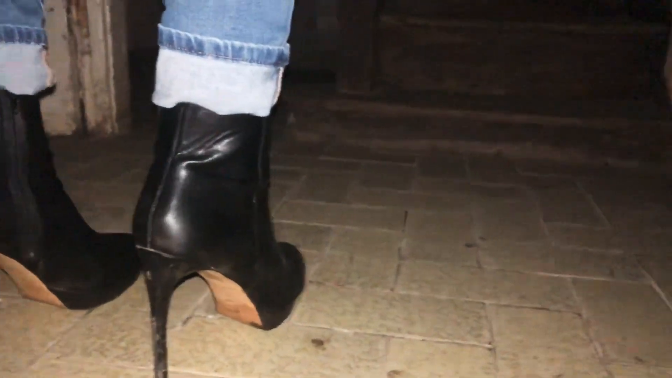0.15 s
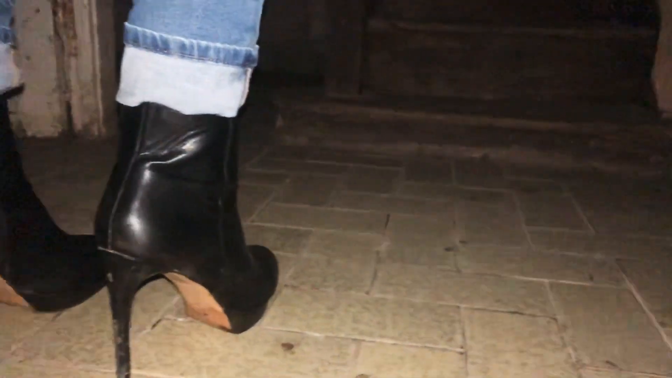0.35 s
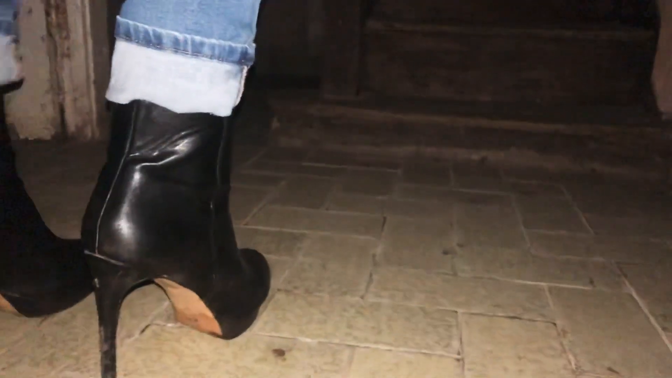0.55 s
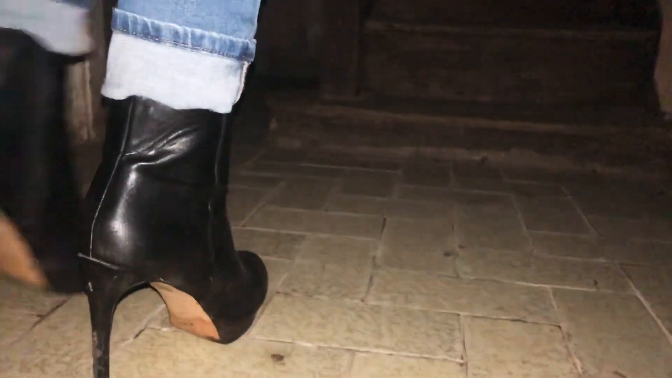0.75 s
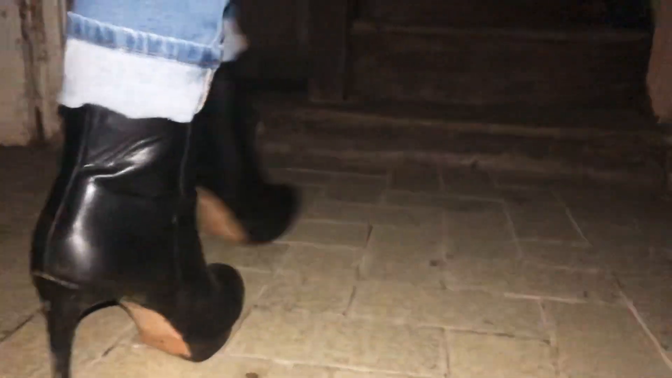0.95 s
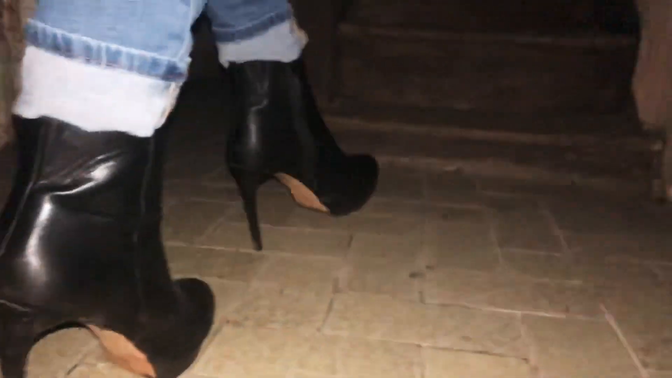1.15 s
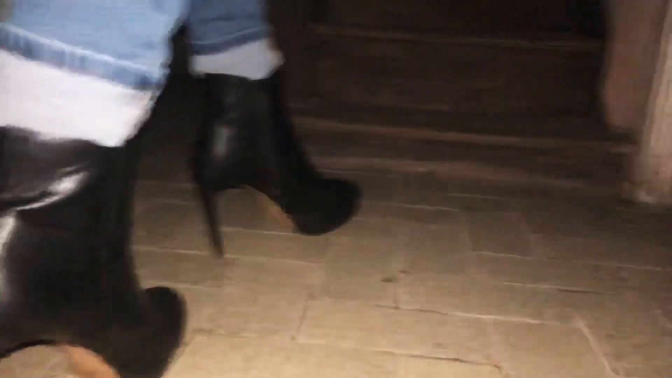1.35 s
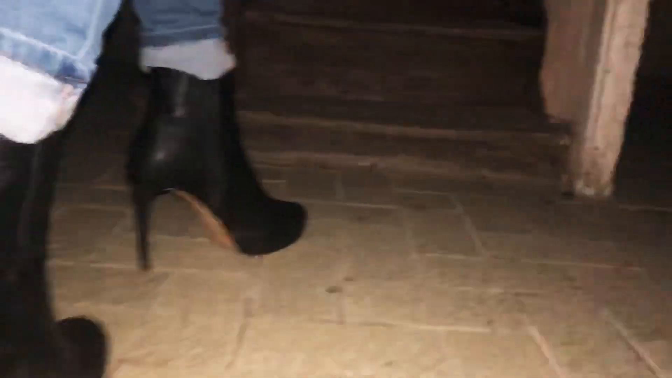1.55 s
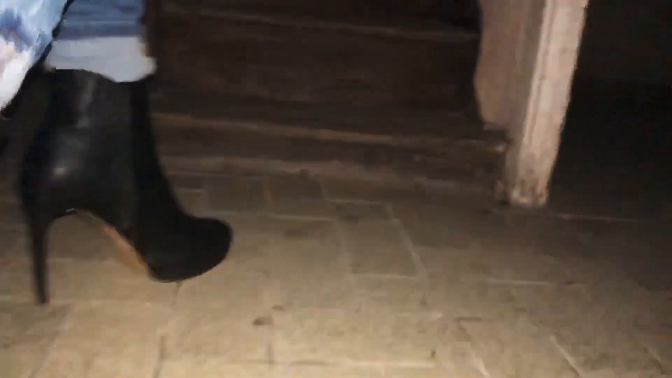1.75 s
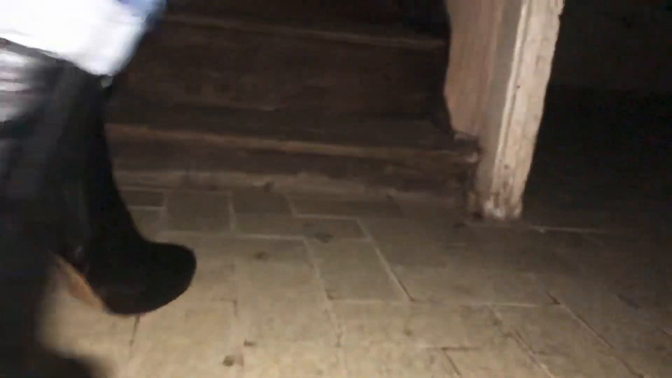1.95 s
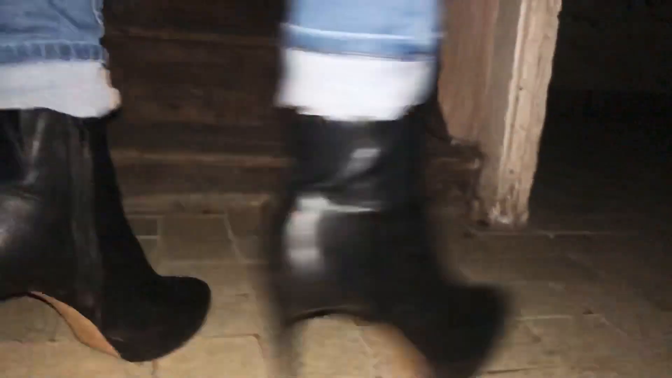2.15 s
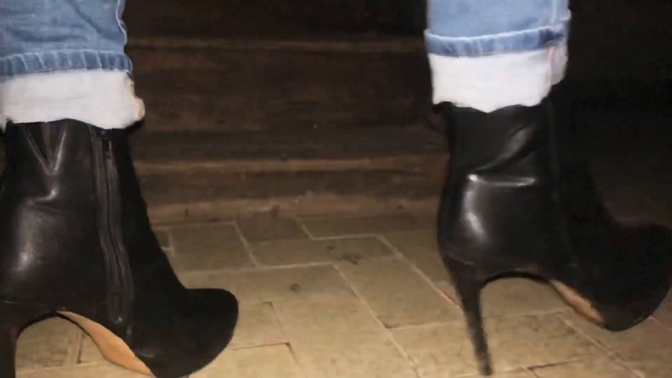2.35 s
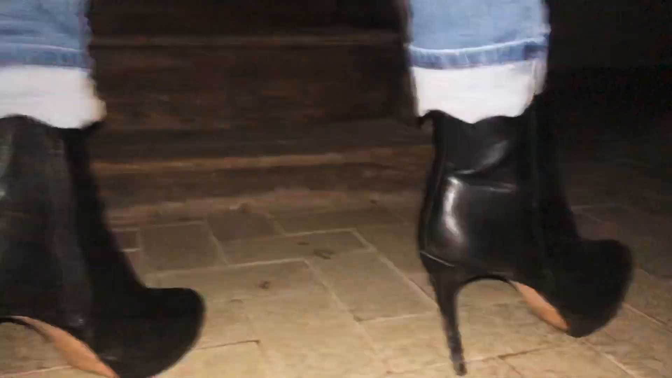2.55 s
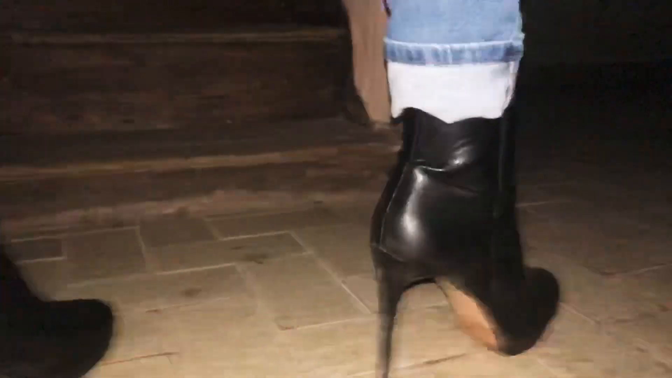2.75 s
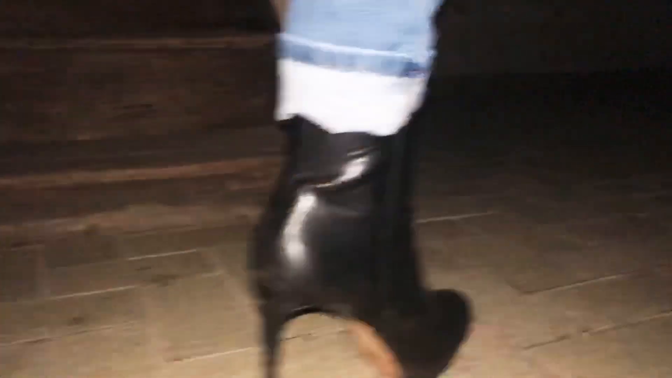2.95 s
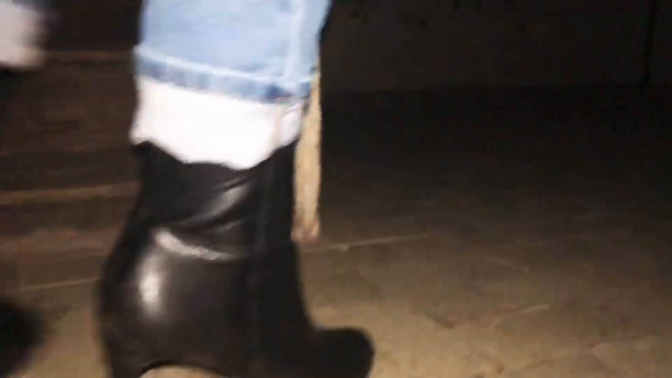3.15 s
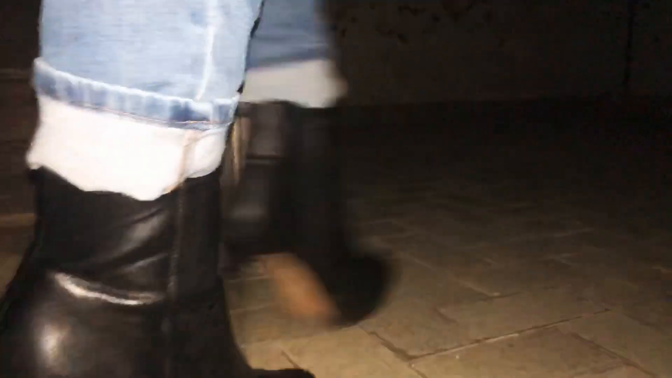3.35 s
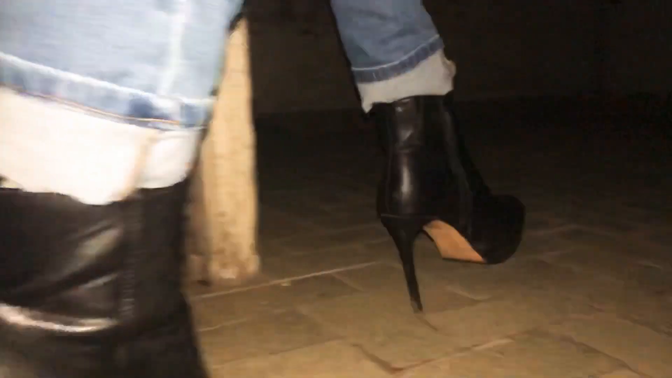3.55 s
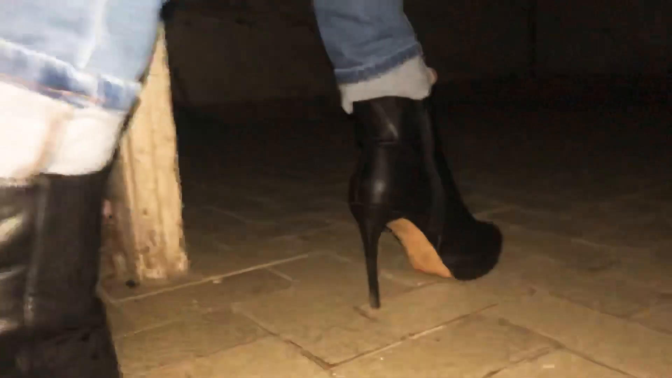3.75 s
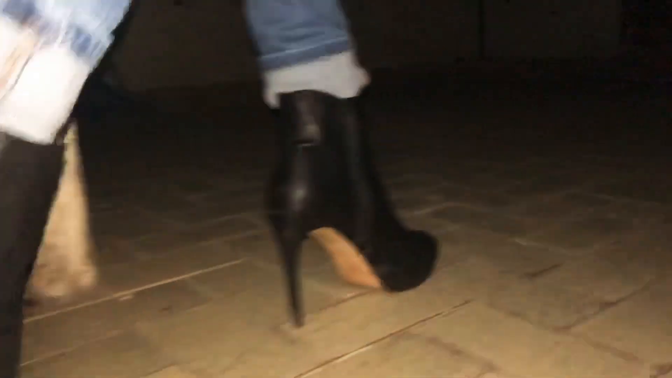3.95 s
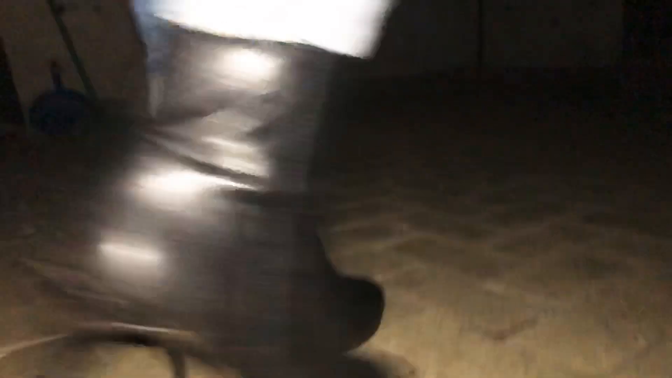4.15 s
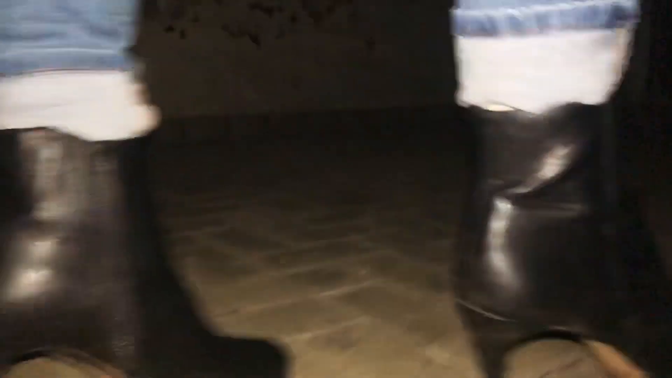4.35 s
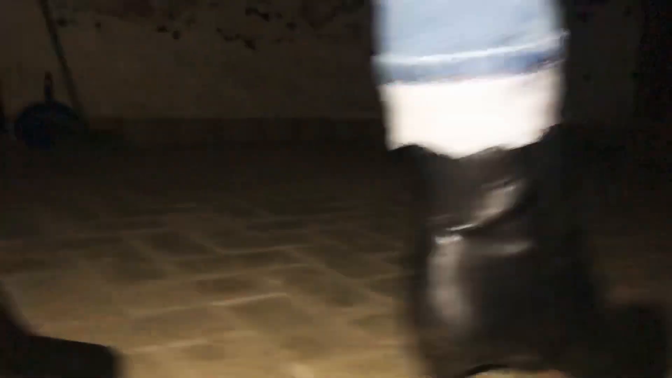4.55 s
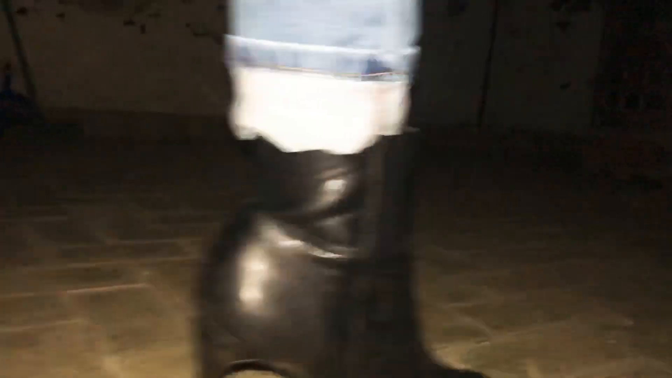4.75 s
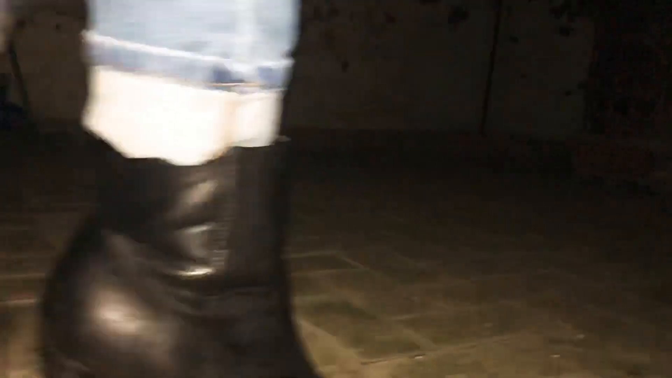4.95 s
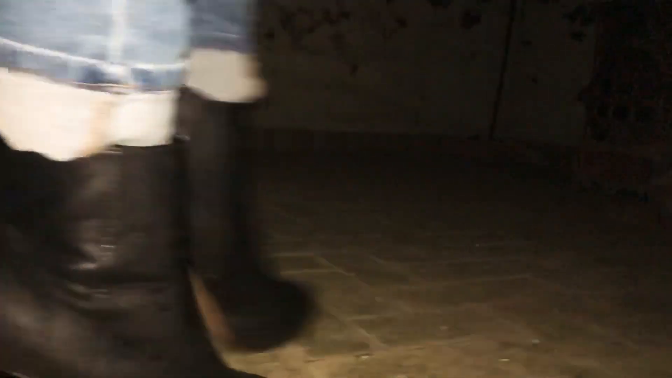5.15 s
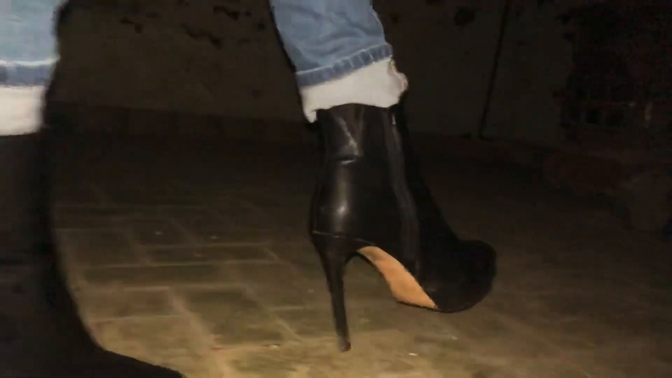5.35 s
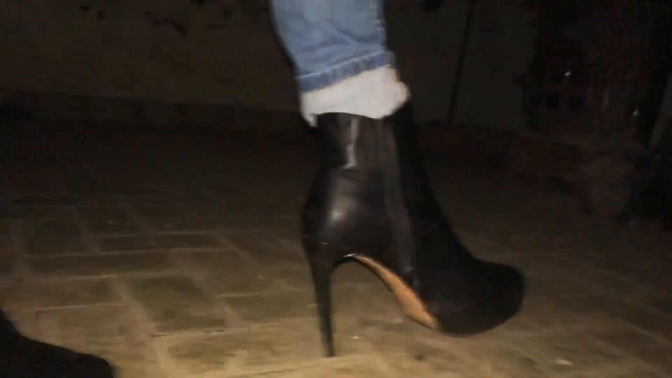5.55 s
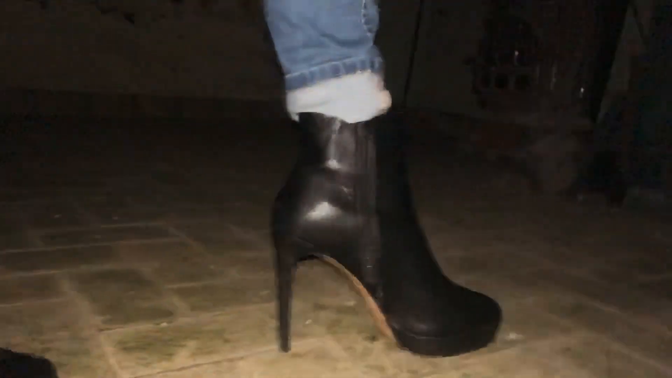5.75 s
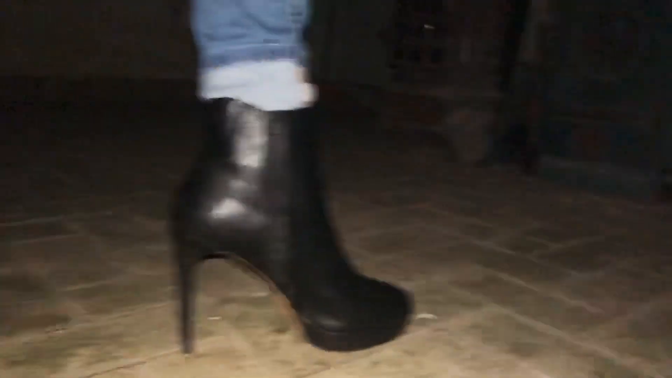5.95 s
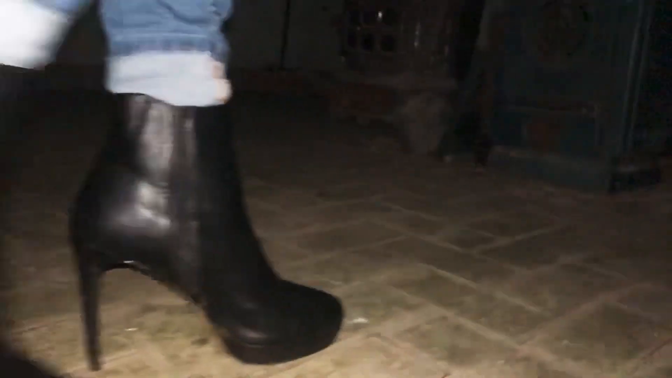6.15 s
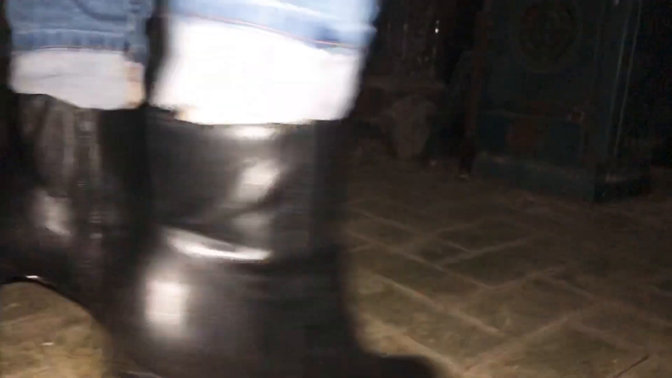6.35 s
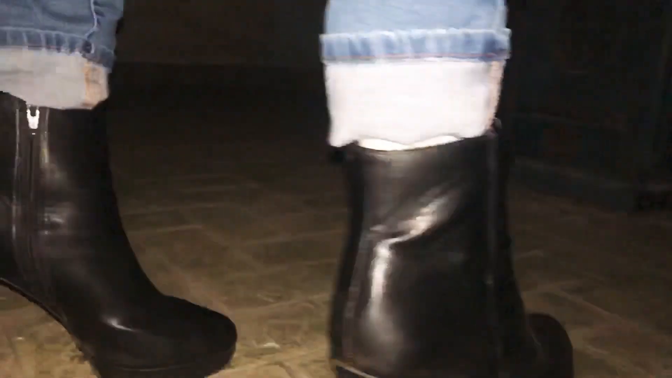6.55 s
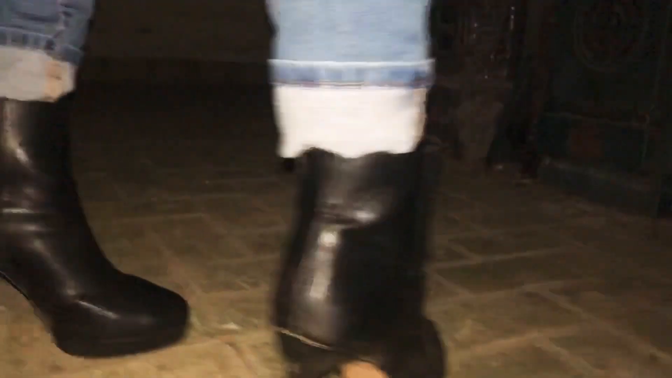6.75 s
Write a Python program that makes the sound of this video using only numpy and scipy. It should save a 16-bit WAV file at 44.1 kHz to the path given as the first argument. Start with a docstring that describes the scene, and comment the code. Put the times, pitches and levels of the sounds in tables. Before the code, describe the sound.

Close, unhurried footsteps of high-heeled leather boots on a sandy stone floor, softly creaking, with a short room echo.

```python
"""An empty building with bare walls and gritty stone tiles: slow steps in high-heeled boots, close by.
Heel and then sole strike the floor, exciting damped modes; sand crunches under them and the sole chirps.
As the weight rolls over, leather creases stick and slip in snaps and creaks, and the clothes rustle.
The walls reverberate with the boots above a faint rumble and hiss."""
import sys
import numpy as np
from scipy import signal
from scipy.fft import rfft, irfft, next_fast_len
from scipy.io import wavfile
from scipy.ndimage import uniform_filter1d

SR = 44100
rng = np.random.default_rng(int(sys.argv[2]) if len(sys.argv) > 2 else 0)


def wav_out(sig):
    """Save sig, one row per channel (or a flat mono array), as 16-bit PCM at SR to the path in sys.argv[1]."""
    wavfile.write(sys.argv[1], SR, np.round(np.clip(np.atleast_2d(sig).T, -1, 1) * 32767).astype(np.int16))


N = 298998

# Levels are relative within each column; a tilt is the brightness of the grit.
# spectrum of the still air: frequency_hz, level_db
AIR_SPECTRUM = [(15, -47), (25, -18.5), (102, -3.5), (134, -8.5), (416, -14), (489, -11), (531, -13.5),
                (818, -17.5), (962, -20), (2050, -25), (2480, -26), (2990, -26), (5000, -27), (8590, -30),
                (16000, -35)]
# course of the building's rumble: time_s, level_db
RUMBLE_LEVELS = [(0, -74), (3.3, -71.5), (4.2, -78.5), (6.78, -84)]
# reverberation time of the room: frequency_hz, t60_s
ROOM_T60 = [(100, 0.74), (250, 0.35), (700, 0.44), (1500, 0.59), (4000, 0.44), (8000, 0.4), (15000, 0.42)]
# colour of the reverberation: frequency_hz, gain_db
ROOM_SPECTRUM = [(60, 8.5), (155, -1.5), (230, -5.5), (310, -2), (450, -4.5), (680, 6), (900, -10),
                 (1400, -4), (3500, -1.5), (8000, -3.5), (15000, -8)]
# denim and leather rub at each push-off and leg swing: peak_s, level_db, build_up_s
RUBS = [(.73, -68, 0.064), (1.4, -68.5, 0.1), (1.88, -62, 0.27), (2.43, -69.5, 0.2), (3.148, -64.5, 0.66),
        (3.5, -68.5, 0.15), (4.07, -61, 0.24), (4.41, -67, 0.14), (4.9, -62.5, 0.45), (5.32, -70, 0.19),
        (5.66, -77, 0.26), (6.13, -66, 0.74), (6.77, -65, 0.11)]
# spectrum of the rustle: frequency_hz, level_db
CLOTH_SPECTRUM = [(300, -2), (900, 1.5), (2000, -2.5), (4500, -5), (8000, -8), (15000, -17)]
# runs of faint ticks around a footfall: start_s, level_db, tick_count, gap_s
TICK_RUNS = [(1.3174, -58.5, 5, .0416), (2.6756, -53.5, 6, 0.045), (3.685, -56.5, 3, .0435),
             (5.622, -59.5, 5, .0405)]
# single slips of a leather crease: start_s, level_db, pitch_hz
SNAPS = [(0.119, -54.5, 5470), (.618, -52.5, 6000), (.722, -49, 4200), (.750, -55, 1520),
         (1.374, -50, 1600), (1.5542, -36.5, 1800), (1.909, -36, 1750), (1.9115, -37.5, 5500),
         (2.432, -54, 4040), (3.1041, -34.5, 2720), (3.123, -46, 1930), (3.172, -48.5, 1480),
         (3.448, -52.5, 1100), (3.507, -48.5, 3730), (4.0465, -46, 2650), (4.077, -46.5, 1620),
         (4.309, -46, 1580), (4.346, -42.5, 3420), (4.361, -47.5, 4350), (4.407, -43.5, 4300),
         (4.426, -44, 4650), (4.8989, -34, 6800), (4.932, -40.5, 1600), (5.219, -47.5, 4800),
         (5.558, -45.5, 1700), (6.0808, -45, 1850), (6.1363, -51, 1680)]
# repeated slips of a crease: start_s, level_db, pitch_hz, slip_count, gap_s
CREAKS = [(1.6352, -28, 4400, 6, 0.0031), (4.8280, -23, 3900, 2, .0101), (4.866, -36, 3200, 2, .01)]
# spectrum of the crack on each slip: frequency_hz, level_db
CRACK_SPECTRUM = [(500, -5.5), (1500, -7.5), (4500, 3.5), (9000, -1), (16000, -12.5)]
# chirps of the gripping sole: start_s, level_db, pitch_hz
SQUEAKS = [(4.766, -36.5, 3440), (5.8690, -46, 3250), (5.8700, -41, 4400)]
# slides of the boot on sand: start_s, level_db, length_s, tilt_db_per_octave
SLIDES = [(1.518, -48, 0.0035, 7.5), (1.558, -40, 0.0076, 1), (1.58, -39.5, 0.0018, 4),
          (2.8204, -54, 0.006, 4), (2.889, -53, 0.0042, 3), (3.652, -55.5, 0.0049, 7),
          (3.8636, -31.5, 0.0036, 2), (4.7136, -46.5, 0.0044, 7), (4.7632, -36.3, 0.0051, 3.2),
          (5.854, -55, 0.016, 0), (5.869, -39, 0.0048, 0.5), (6.134, -42.5, 0.0026, 1.5),
          (6.716, -46, 0.0024, 8)]
# spectrum of crushed sand: frequency_hz, level_db
GRIT_SPECTRUM = [(500, -2), (1200, -1.5), (2500, 0.5), (4000, 3), (6500, -1), (9000, -3.5), (12000, -6),
                 (16000, -12.5)]
# spectrum of the hard contact edge: frequency_hz, level_db
EDGE_SPECTRUM = [(300, -7), (900, 2.5), (1250, 4), (1700, -3), (2200, -6), (3000, -16), (4500, -30),
                 (8000, -31)]
# heel and sole impacts: start_s, thump_db, knock_db, clack_db, edge_db, grit_db, tilt_db_per_octave
LANDINGS = [(0.5640, -40.5, -46, -55, -50.5, -57, 1.5), (1.3940, -36, -30, -42.5, -42.5, -54, -5.5),
            (1.5247, -37.5, -38.5, -34, -45, -56.5, -1), (2.6233, -33.5, -30, -34, -38, -39.5, -3.5),
            (2.791, -38.5, -44, -50, -42.5, -50, 4.5), (2.8166, -31, -26, -29.5, -46, -49, -0.5),
            (3.1040, -51.5, -48, -60, -45, -53, -5), (3.6244, -35.5, -32.5, -31.5, -38, -45.5, 4),
            (3.7489, -32, -31, -39.5, -47, -65, 5), (3.8670, -40, -38, -53, -36, -39, 0),
            (4.6225, -23.5, -28.5, -21, -36, -36.5, -2.5), (4.7580, -29.5, -25, -25, -35.5, -36.5, -6),
            (5.2945, -45, -59, -55, -52, -62, -12), (5.6660, -45, -54, -73, -74, -62, 6),
            (5.7033, -28, -24.5, -38.5, -39, -60, -7), (5.8290, -31.5, -37, -52, -55, -55, 3.5),
            (6.7116, -28.5, -34, -25, -34.5, -53, 4)]

RUB_RELEASE_S, RUB_REST_DB = 0.11, -82.5  # a rub dies away to the stir of the clothes
CREAK_FADE_DB_PER_S = 304  # each slip relieves the crease
SQUEAK_WAVER = 0.044  # rms share by which a chirp's pitch wanders
GRIT_LEAD_S, GRIT_CRUSH_S = 0.0024, 0.0054  # sand is crushed just before the boot meets the stone
CRUSH_SEND_DB, SLIDE_SEND_DB = -3.5, -1.5  # sent to the walls; for a slide, at zero tilt
SEND_LOSS_PER_TILT = 1.1  # dB less of a slide sent for each dB per octave of tilt
KNOCK_HZ, USUAL_THUMP_DB, SAG_OCTAVES_PER_DB = 470, -32.5, 0.07  # a heavier landing knocks lower
FLOOR_HZ, FLOOR_T60_S, FLOOR_DB = 170.5, 0.26, -21  # the floor's boom; its level follows the thump
TOP_HZ = 16000


def amp(db):
    """Amplitude ratio of a level in decibels."""
    return 10 ** (np.asarray(db) / 20)


def unit_rms(x):
    """Normalisation to an rms of 1."""
    return x / np.sqrt(np.mean(x ** 2) + 1e-20)


def log_interp(points, hz):
    """Interpolation of (frequency_hz, value) points on a logarithmic frequency axis."""
    frequencies, values = np.transpose(points)
    return np.interp(np.log(hz + 1), np.log(frequencies + 1), values)


def clock(size):
    """Sample times in seconds."""
    return np.arange(size) / SR


def add(track, start_s, sound):
    """Superposition of a sound on the track."""
    part = track[max(round(start_s * SR), 0):][:len(sound)]
    part += sound[:len(part)]


def filtered(x, response):
    """Linear filtering: the spectrum is multiplied by a frequency response."""
    size = next_fast_len(len(x) + min(len(x), 8192), True)
    return irfft(rfft(x, size) * response(np.fft.rfftfreq(size, 1 / SR)), size)[:len(x)]


def coloured(x, spectrum):
    """Spectral shaping by (frequency_hz, level_db) points."""
    return filtered(x, lambda hz: amp(log_interp(spectrum, hz)))


def wobble(rate_hz):
    """Random modulation: straight ramps between Gaussian values drawn at the given rate."""
    knots = rng.standard_normal(int(N * rate_hz / SR) + 4)
    return uniform_filter1d(knots[(clock(N) * rate_hz).astype(int)], max(int(SR / rate_hz), 1))


def damped_mode(t, hz, cycles):
    """A heavily damped oscillator swells with the push, peaks after so many cycles and dies quickly."""
    rise = t * hz / cycles
    return (rise * np.exp(1 - rise)) ** 3 * np.sin(2 * np.pi * hz * t)


def diffuse_pulse(sound, spectrum):
    """Averaged over all directions, a click keeps its energy and only its material's overall colour."""
    pulse = coloured(signal.unit_impulse(len(sound), 32), spectrum)
    return pulse * np.linalg.norm(sound) / np.linalg.norm(pulse)


def building_air():
    """Ambient noise: a steady broadband hiss and a narrow-band rumble that swells and fades unevenly."""
    hiss = unit_rms(coloured(rng.standard_normal(N), AIR_SPECTRUM))
    rumble = unit_rms(filtered(rng.standard_normal(N), lambda hz: 1 / (1 + ((hz - 113) / 16) ** 2)))
    rumble_db = np.interp(clock(N), *np.transpose(RUMBLE_LEVELS)) + 5.7 * wobble(12)
    return amp(-68.5) * hiss + amp(rumble_db) * rumble


def wall_reverberation(sent, early_db, early_t60_s, onset_s):
    """Reverberation: early reflections and a longer tail decay exponentially in each frequency band."""
    size, hop = 32768, 11025
    hz, t, _ = signal.stft(np.zeros(size), SR, nperseg=256)
    t60 = log_interp(ROOM_T60, hz)[:, None]
    late_power = amp(-120 * t / t60) / t60
    early_power = amp(2 * early_db - 120 * t / early_t60_s) / early_t60_s
    decay = np.sqrt((late_power + early_power) * np.log(10 ** 6) / SR)
    gain = amp(log_interp(ROOM_SPECTRUM, hz))[:, None] * decay
    starts = range(0, N, hop)  # the echo pattern changes as the walker moves on
    echoes = signal.stft(rng.standard_normal((len(starts), size)), SR, nperseg=256)[2]
    onset = np.clip(clock(size) / onset_s, 0, 1) ** 2
    tails = signal.istft(echoes * gain, SR, nperseg=256)[1] * onset
    out = np.zeros(N)
    for start, tail in zip(starts, tails):
        add(out, start / SR, signal.fftconvolve(sent[start:start + hop], tail))
    return out


def deep_bump():
    """Two low damped modes superpose in a soft bump under one footfall."""
    out, t = np.zeros(N), clock(16384)
    add(out, 3.615, amp(-52.5) * (damped_mode(t, hz=52, cycles=2.5) + damped_mode(t, hz=92, cycles=3.1)))
    return out


def clothes_rustle():
    """Friction of trouser legs and boot shafts makes grainy noise that grows and dies with each move."""
    t = clock(N)
    rustle = rng.standard_normal(N) * amp(2.9 * wobble(700))
    crinkles = unit_rms(rng.standard_normal(N) * (rng.random(N) < 90 / SR))  # about 90 a second
    moves = [amp(db) * np.exp(np.minimum((t - peak_s) / build_up_s, (peak_s - t) / RUB_RELEASE_S))
             for peak_s, db, build_up_s in RUBS]
    motion = np.hypot(amp(RUB_REST_DB), np.linalg.norm(moves, axis=0))  # incoherent sources add in power
    cloth = unit_rms(coloured(rustle + amp(-8) * crinkles, CLOTH_SPECTRUM))
    return motion * amp(1.46 * wobble(22)) * cloth


def faint_ticks():
    """Narrow-band transients tick in short even runs, perhaps a zip pull swinging."""
    out, t = np.zeros(N), clock(512)
    envelope = t / 0.00081 * np.exp(1 - t / 0.0011)
    band = lambda hz: 1 / (1 + ((hz - 5900) / 950) ** 4)
    for start_s, db, count, gap_s in TICK_RUNS:
        for delay_s in np.arange(count) * gap_s:
            ring = unit_rms(filtered(rng.standard_normal(len(t)), band))
            add(out, start_s + delay_s, amp(db - 5) * envelope * ring)
    return out


def leather_snaps():
    """Stick-slip at a crease: each slip excites a broad resonance and a crack; a train of them creaks."""
    direct, sent, t = np.zeros(N), np.zeros(N), clock(512)
    slips = [(start_s + delay_s, db - CREAK_FADE_DB_PER_S * delay_s, hz)
             for start_s, db, hz, count, gap_s in CREAKS for delay_s in np.arange(count) * gap_s]
    for start_s, db, hz in SNAPS + slips:
        crack = amp(-60 * t / 0.0076) * unit_rms(coloured(rng.standard_normal(len(t)), CRACK_SPECTRUM))
        ring = damped_mode(t, hz, cycles=1.18)
        snap = amp(db) * (0.78 * ring + 0.34 * hz / 4000 * crack)  # tighter creases: higher, more crack
        add(direct, start_s, snap)
        add(sent, start_s, amp(-10) * snap + amp(-7.5) * diffuse_pulse(snap, CRACK_SPECTRUM))
    return np.array([direct, sent])


def sole_squeaks():
    """Friction-driven oscillation: the sole grips the tile and chirps with a wavering pitch."""
    chirps, t = np.zeros(N), clock(1024)
    for start_s, db, hz in SQUEAKS:
        waver = SQUEAK_WAVER * unit_rms(uniform_filter1d(rng.standard_normal(len(t)), size=24))
        add(chirps, start_s, amp(db) * damped_mode(t + np.cumsum(waver) / SR, hz, cycles=5.3))
    direct, sent = amp(1) * chirps, amp(-1) * chirps
    return np.array([direct, sent])


def grit_scrapes():
    """Granular noise: each landing and slide crushes sand for milliseconds; finer sand is brighter."""
    direct, sent, t = np.zeros(N), np.zeros(N), clock(1024)
    crushes = [(start_s - GRIT_LEAD_S, db, GRIT_CRUSH_S, tilt, CRUSH_SEND_DB)
               for start_s, *_, db, tilt in LANDINGS]
    slides = [(start_s, db, length_s, tilt, SLIDE_SEND_DB - SEND_LOSS_PER_TILT * tilt)
              for start_s, db, length_s, tilt in SLIDES]
    for start_s, db, length_s, tilt, send_db in crushes + slides:
        spectrum = [(hz, level + tilt * np.log2(hz / 4000)) for hz, level in GRIT_SPECTRUM]
        bounce_s = rng.uniform(0.00044, 0.001076)
        # interference with the floor reflection combs the treble
        comb = lambda hz: 1 + 0.47 * np.exp(-2j * np.pi * hz * bounce_s)
        grains = rng.standard_normal(len(t)) * amp(2.2 * rng.standard_normal(len(t)))
        envelope = (1 - np.exp(-t / 0.0012)) / (1 + (t / length_s) ** 6)
        burst = amp(db + 0.5) * envelope * unit_rms(filtered(coloured(grains, spectrum), comb))
        add(direct, start_s, burst)
        add(sent, start_s, amp(send_db) * diffuse_pulse(burst, spectrum))
    return np.array([direct, sent])


def boot_landings():
    """Impact excites damped modes: the platform sole thumps, heel knocks, tile clacks and floor booms."""
    direct, sent, t = np.zeros(N), np.zeros(N), clock(8192)
    radiation = lambda hz: -hz ** 2 / (95 ** 2 - hz ** 2 + 115j * hz)  # a small body radiates little bass
    for start_s, thump_db, knock_db, clack_db, edge_db, *_ in LANDINGS:
        knock_hz = KNOCK_HZ * 2 ** (SAG_OCTAVES_PER_DB * (USUAL_THUMP_DB - thump_db))
        thump = amp(thump_db) * damped_mode(t, hz=210, cycles=0.62)
        knock = amp(knock_db + 3) * damped_mode(t, knock_hz, cycles=0.86)
        clack = amp(clack_db) * damped_mode(t, hz=839, cycles=1.31)
        body = filtered(thump - knock + clack, radiation)
        # the hard edge of the contact adds a brief rattle above the clack
        edge_envelope = amp(edge_db + 2 - 60 * t / 0.017) * (1 - np.exp(-t / 0.00069))
        edge = edge_envelope * unit_rms(coloured(rng.standard_normal(len(t)), EDGE_SPECTRUM))
        boom_envelope = amp(thump_db + FLOOR_DB - 60 * t / FLOOR_T60_S) * (1 - np.exp(-t / 0.0015))
        boom = boom_envelope * np.sin(2 * np.pi * FLOOR_HZ * t)
        add(direct, start_s, body + edge + boom)
        add(sent, start_s, amp(-3.5) * body + amp(-0.5) * diffuse_pulse(edge, EDGE_SPECTRUM))
    return np.array([direct, sent])


def scene():
    """Superposition of the boots' direct and reverberant sound, the clothes and the still building."""
    direct, sent = boot_landings() + grit_scrapes() + sole_squeaks() + leather_snaps()
    walls = wall_reverberation(sent, early_db=-6, early_t60_s=0.29, onset_s=0.0033)
    return (direct + walls + faint_ticks() + clothes_rustle() + deep_bump() + building_air())[None]


def record(dry):
    """Band limiting: the microphone loses the deepest bass and keeps nothing above TOP_HZ."""
    response = lambda hz: (1j * hz / (22 + 1j * hz)) ** 2 * (hz < TOP_HZ)
    return np.array([filtered(channel, response) for channel in dry])


dry = scene()
out = record(dry)
wav_out(out)
```